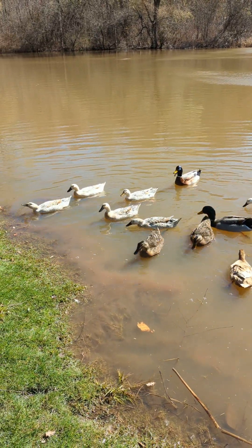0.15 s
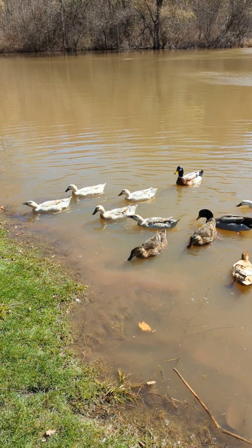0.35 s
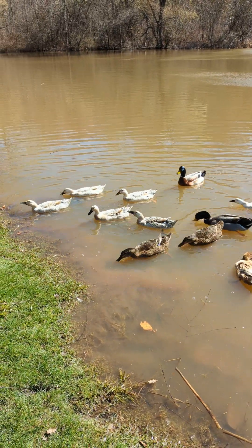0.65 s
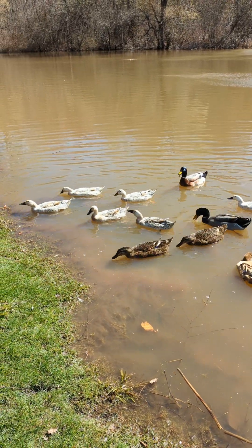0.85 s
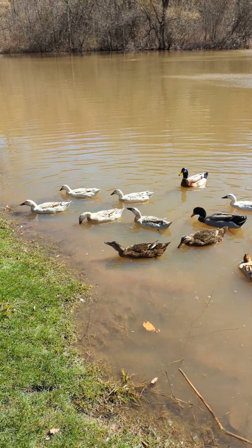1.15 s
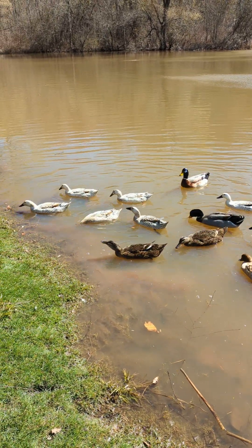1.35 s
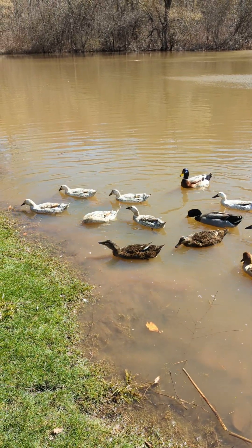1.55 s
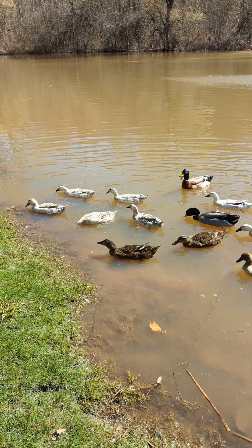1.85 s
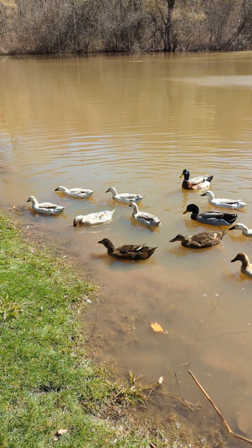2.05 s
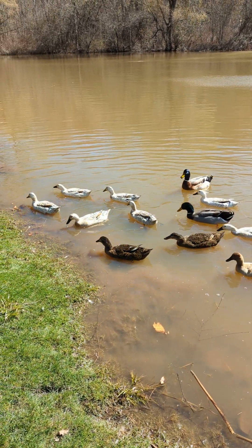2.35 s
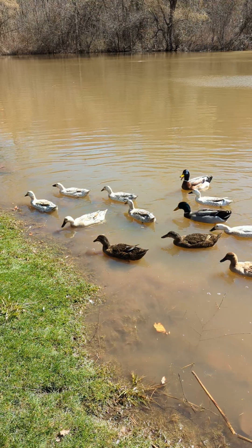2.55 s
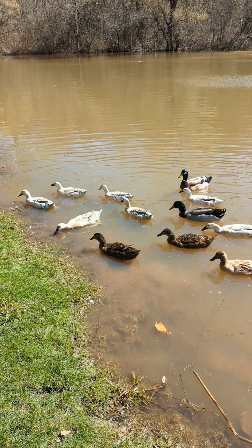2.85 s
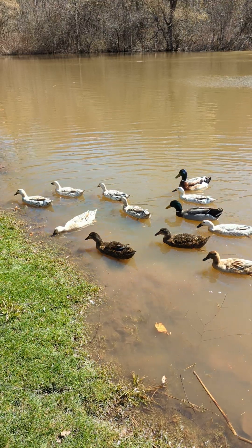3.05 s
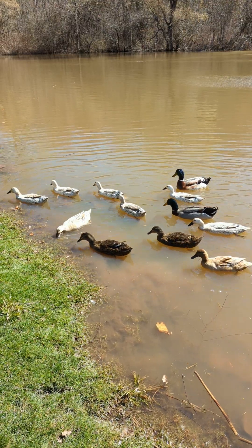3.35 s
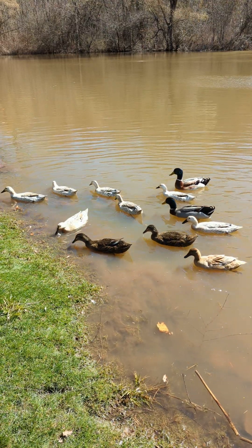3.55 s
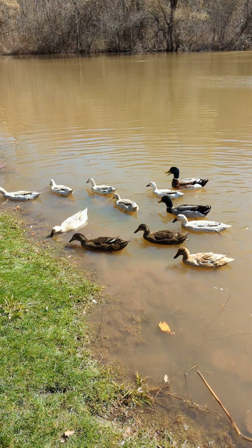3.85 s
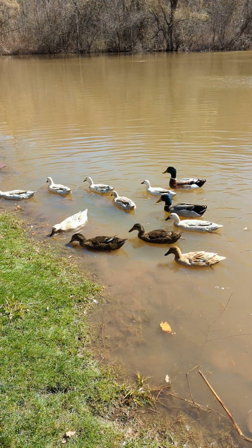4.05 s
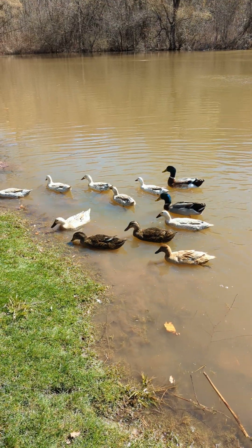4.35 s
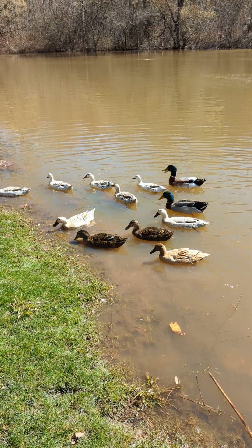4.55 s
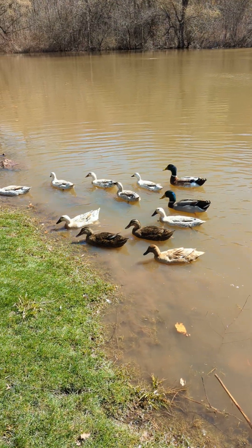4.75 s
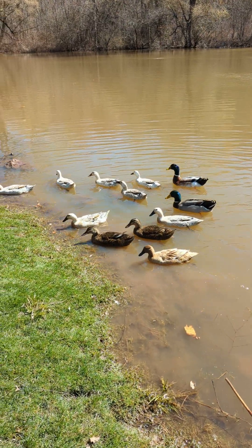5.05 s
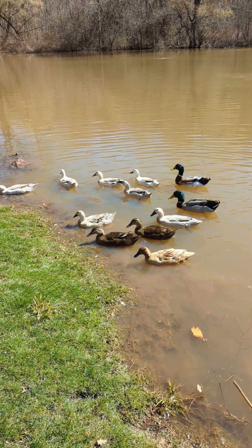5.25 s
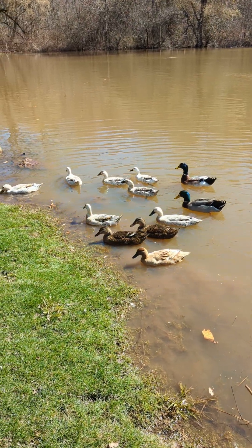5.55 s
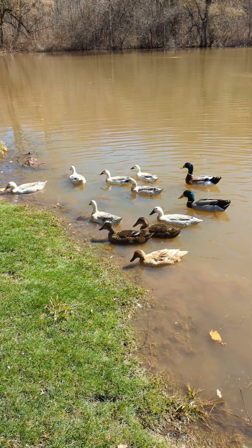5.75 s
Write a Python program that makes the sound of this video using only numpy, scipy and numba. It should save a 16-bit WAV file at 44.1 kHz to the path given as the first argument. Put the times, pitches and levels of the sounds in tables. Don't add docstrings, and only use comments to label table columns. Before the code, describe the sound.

Open pond, handheld stereo microphone: seven short, grating duck calls made of fast air puffs, dry and fairly close, with only weak echoes from water and banks. Wind thumps softly in the first second, bubbles plop and grass crackles mostly between one and three seconds, then it thins to tiny ticks. A low traffic roar, faint hiss and barely audible cricket continue throughout.

```python
import sys
import numpy as np
from scipy import signal
from scipy.io import wavfile
from scipy.ndimage import uniform_filter1d
from numba import njit

SR = 44100
rng = np.random.default_rng(int(sys.argv[2]) if len(sys.argv) > 2 else 0)


def unload_wav(signal):
    wavfile.write(
        sys.argv[1],
        SR,
        np.round(np.clip(np.atleast_2d(signal).T, -1, 1) * 32767).astype(np.int16),
    )


def amplitude_ratio(level_db):
    exponent = np.asarray(level_db, float) / 20
    return 10 ** exponent


N = 260190


def rms_one(x):
    return x / np.sqrt(np.mean(x ** 2) + 1e-20)


def in_time(rows, t=np.arange(N) / SR):
    s, *columns = np.transpose(rows)
    return [np.interp(t, s, c) for c in columns]


def at_hz(points, hz):
    table_hz, values = np.array(points).T[:2]
    return np.interp(np.log(hz), np.log(table_hz), values)


def drift(rate):
    r = np.exp(-80 * np.pi * rate / SR)
    white = rng.standard_normal(N // 40 + 2002)
    slow = signal.lfilter([1], [1, -2 * r, r * r], white)[2000:]
    return np.interp(np.arange(N) / 40, np.arange(len(slow)), rms_one(slow))


def bump(s, width):
    return np.exp(-((np.arange(N) / SR - s) / width) ** 2)


def resonate(x, hz, width):
    r = np.exp(-np.pi * width / SR)
    feedback = [1, -2 * r * np.cos(2 * np.pi * hz / SR), r * r]
    return signal.lfilter([(1 - r * r) / 2, 0, (r * r - 1) / 2], feedback, x)


@njit
def gliding(x, hz, r, turn):
    y = np.zeros(len(x))
    for i in range(2, len(x)):
        y[i] = x[i] - x[i - 2] + 2 * r * np.cos(turn * hz[i]) * y[i - 1] - r * r * y[i - 2]
    return y


def pan(x, db):
    return x * amplitude_ratio(np.array([db / 2, -db / 2]).reshape(2, -1))


# f/Hz, likeness/0-1
LIKENESS = [(60, 1), (180, 0.97), (550, 0.88), (1650, 0.14), (4970, 0.06), (15000, 0.08)]


def banded_noise(spectrum, low_hz, count, patchy_db, flicker, alike_share):
    out, together = 0, drift(flicker / 3)
    edges = np.minimum(low_hz * 2 ** (np.arange(count + 1) / 3), .45 * SR)
    white = rng.standard_normal((2, 2, N))
    for k, (low, high) in enumerate(zip(edges, edges[1:])):
        band = signal.butter(2, [low, high], "band", fs=SR, output="sos")
        mid, side = signal.sosfilt(band, white[k % 2])
        hz = np.sqrt(low * high)
        alike = np.clip(alike_share * at_hz(LIKENESS, hz), 0, 1)
        gain = amplitude_ratio(at_hz(spectrum, hz) + patchy_db * (.6 * together + drift(flicker)))
        out = out + gain * (np.sqrt(1 + alike) * mid + np.sqrt(1 - alike) * side * [[1], [-1]])
    return rms_one(out)


def wavering(hz, width):
    moving_hz = hz + 0.292 * width * drift(7.0)
    return amplitude_ratio(2.43 * drift(5.8)) * np.sin(2 * np.pi * np.cumsum(moving_hz) / SR)


# t/s, level/dB
TRAFFIC_SWELLS = [(0.0, -64.5), (0.36, -63.5), (0.85, -68), (1.13, -61), (1.53, -63.5), (1.94, -58.5),
                  (2.27, -64.5), (2.63, -59.5), (2.99, -63), (3.16, -60.5), (3.71, -65.5), (4.01, -59),
                  (4.29, -61.5), (5.01, -60), (5.9, -59)]
# f/Hz, level/dB per Hz
TRAFFIC_COLOUR = [(24, -55), (40, -10), (119, -2.5), (139, -14), (173, -7.5), (206, -4.5), (319, -15.5),
                  (473, -9.5), (1400, -11), (1610, -15.5), (1920, -18), (2210, -16.5), (4500, -42),
                  (5850, -65), (9900, -120)]
# f/Hz, level/dB per Hz
HISS_COLOUR = [(1470, -29), (2500, 13.5), (5350, -3), (5920, 21), (8600, -46), (11600, -78), (13200, -14),
               (14500, 4), (16000, -4)]
# f/Hz, width/Hz, level/dB
HUMS = [(146.8, 10.7, -68.5), (205.4, 8.3, -66.5), (239.3, 2.03, -74), (1533, 12.2, -77.5),
        (1750, 20.1, -78.5), (14060, 40, -95)]
HISS_DB, HISS_FOLLOWS = -71.5, 0.2
CRICKET_HZ, CRICKET_WIDTH_HZ, CRICKET_DB, CHIRPS_PER_S = 12000, 170, -90.5, 29
PORT_HZ, PORT_WIDTH_HZ, PORT_DB = 5980, 900, -77


def distance():
    traffic_db, = in_time(TRAFFIC_SWELLS)
    hiss_db = HISS_DB + HISS_FOLLOWS * (traffic_db - traffic_db.mean())
    roar = banded_noise(TRAFFIC_COLOUR, 45, count=20, patchy_db=.5, flicker=9, alike_share=.99)
    hiss = banded_noise(HISS_COLOUR, 2970, count=8, patchy_db=3.5, flicker=26, alike_share=.37)
    tones = sum(amplitude_ratio(db) * wavering(hz, width) for hz, width, db in HUMS)
    chirps = np.maximum(0, np.sin(2 * np.pi * CHIRPS_PER_S * np.arange(N) / SR + drift(2.5)))
    cricket = chirps * resonate(rng.standard_normal(N), CRICKET_HZ, CRICKET_WIDTH_HZ)
    port = rng.standard_normal((2, N))
    for _ in range(2):
        port = resonate(port, PORT_HZ, PORT_WIDTH_HZ)
    out = amplitude_ratio(traffic_db + 3) * roar + amplitude_ratio(hiss_db) * hiss
    out = out + amplitude_ratio(traffic_db + 63) * tones
    return out + amplitude_ratio(CRICKET_DB) * rms_one(cricket) + amplitude_ratio(hiss_db - HISS_DB + PORT_DB) * rms_one(port)


# t/s, level/dB
BREEZE = [(0, -61), (.4, -53), (.68, -51), (.82, -64.5), (2.0, -60.5), (3.5, -62), (4.2, -72), (5.9, -72.5)]
# t/s, peak level/dB, left-right/dB
GUSTS = [(.43, -56, -14), (.61, -58.5, -15), (1.0, -51, 0), (1.12, -59, -10), (1.28, -57, -1),
         (1.39, -58, -6), (1.6, -62.5, -18), (1.77, -62, 11), (1.89, -60.5, 13), (2.19, -53, -4),
         (2.63, -69, 6), (2.89, -58, -16), (3.02, -69, -12), (3.37, -57.5, -10), (3.48, -62, -11),
         (3.68, -69, 12), (4.34, -58.5, 16), (4.49, -66, 4), (5.65, -68, 10)]
# f/Hz, level/dB per Hz
BUFFET_COLOUR = [(15, -46), (25, -55), (41, 2), (108, 0), (227, -12.5), (375, -19), (409, -69), (500, -39),
                 (650, -69), (1100, -120)]
GUST_S, BREEZE_SIDE_DB = 0.031, -3.5


def wind():
    breeze_db, = in_time(BREEZE)
    level = pan(amplitude_ratio(breeze_db), BREEZE_SIDE_DB)
    for s, db, side_db in GUSTS:
        level = level + pan(amplitude_ratio(db) * bump(s, GUST_S), side_db)
    lumps = amplitude_ratio(3.3 * np.array([drift(16), drift(24)]))
    rumble = banded_noise(BUFFET_COLOUR, 27.24, count=12, patchy_db=3, flicker=7.8, alike_share=0)
    return level * rms_one(lumps * rumble)


# t/s, peak level/dB, f/Hz, left-right/dB
THUMPS = [
    (0.439, -43.5, 108, -18),
    (.538, -46.5, 113, 7),
    (.695, -50.5, 130, 11),
    (2.233, -46, 72, -20),
]


def thumps():
    out = np.zeros((2, N))
    for s, peak_db, hz, side_db in THUMPS:
        cycles = np.arange(round(2 * SR / hz)) * hz / SR
        push = np.sin(np.pi * cycles / 2) ** 2 * np.cos(2 * np.pi * cycles + np.pi)
        at = round(s * SR)
        out[:, at:at + len(cycles)] += pan(amplitude_ratio(peak_db) * push, side_db)
    return out


# t/s, level/dB
RUSTLE = [(0.0, -68.5), (0.7, -74), (1.4, -71), (2.2, -67), (2.6, -80), (3.0, -64.5), (3.6, -74.5),
          (4.3, -73.5), (5.9, -78.5)]
# f/Hz, level/dB per Hz
GRASS_COLOUR = [(1470, -37), (2500, -7), (3080, -4), (3230, -15), (4020, -10.5), (8940, -12),
                (15200, -16.5), (16000, -11)]
# t/s, peak level/dB, length/s
BRUSHES = [(0.669, -53, 0.02), (1.24, -44, 0.029), (1.31, -38, 0.025), (1.37, -42.5, 0.018),
           (1.477, -35, 0.0068), (1.636, -37.5, 0.019), (1.83, -44, 0.019), (2.187, -53, 0.025),
           (2.2862, -42, 0.011), (2.338, -39, 0.013), (2.629, -48, 0.024), (2.789, -42, 0.016),
           (2.893, -41.5, 0.021), (2.922, -42.5, 0.031), (3.018, -56, 0.0097), (3.364, -50, 0.0089),
           (5.66, -60, 0.011)]
CALL_SWELL_DB, CALL_SWELL_S = -25, 0.14


def grass():
    t, (level_db,) = np.arange(N) / SR, in_time(RUSTLE)
    level = amplitude_ratio(level_db - 2.5)
    for (first, full, _), (call_db, *_) in zip(CALL_TIMES, CALL_DB):
        level = level + amplitude_ratio(call_db + CALL_SWELL_DB) * bump(first + full - .06, CALL_SWELL_S)
    for s, peak_db, length in BRUSHES:
        age = np.clip((t - s) / length, 0, 9)
        level = level + amplitude_ratio(peak_db - 18) * np.sqrt(age) * np.exp(-age ** 2)
    grains = amplitude_ratio(2.5 * drift(170))
    rub = banded_noise(GRASS_COLOUR, 3000, count=8, patchy_db=1.3, flicker=30, alike_share=.9)
    return level * rms_one(grains * rub)


# t/s, peak level/dB, f/Hz, top crack level/dB, left-
# right/dB
TICKS = [(0.4455, -53, 4420, -75, -1.5), (0.5185, -58, 5840, -54, -3), (0.628, -55, 4300, -77, 0.0),
         (0.6659, -51, 6000, -74, -1.5), (1.242, -39, 5330, -65, -8), (1.25, -38.5, 6100, -43, -5),
         (1.9549, -66, 4250, -71, 0.0), (2.1996, -57, 5030, -68, 3), (2.2172, -49, 8050, -46, -1.5),
         (2.2862, -57, 6660, -63, -0.5), (2.799, -52, 7200, -47, 3), (2.984, -38.5, 5760, -50, -9),
         (3.022, -50, 5470, -69, -8), (3.0383, -58, 5900, -51, -0.5), (3.372, -52, 4800, -48, -1.0),
         (4.1006, -50.5, 6140, -72, -25), (4.2237, -53, 5970, -78, -3), (4.4757, -59, 6300, -77, 10),
         (4.804, -55, 6220, -75, -8), (4.8688, -53, 6240, -67, -0.5), (4.923, -57, 6000, -53, -4),
         (5.661, -53, 4400, -56, -1),
         (0.0608, -74, 12100, -69, 0.1),
    (1.8284, -42, 11100, -49, 0.1),
    (2.632, -48, 9000, -54, 0.1),
    (3.813, -61, 8980, -72, 0.1),
    (3.9265, -61, 12000, -69, 0.1),
    (3.974, -65, 8360, -52, 0.1),
    (4.0127, -51, 12600, -63, 0.1),
    (4.0744, -60, 13500, -50, 0.1),
    (5.3792, -71, 14000, -70, 0.1),
]
# t/s, peak level/dB, f/Hz, time to fall 60 dB/s
PLOPS = [
    (1.2388, -36, 1430, 0.006),
    (1.3027, -29.5, 1740, 0.0089),
    (1.5384, -55, 1510, 0.011),
]


def droplets():
    out, t = np.zeros((2, N)), np.arange(900) / SR
    top = signal.butter(1, 5000, "high", fs=SR, output="sos")
    for s, peak_db, hz, top_db, side_db in TICKS:
        burst = rng.standard_normal((2, len(t))) * t / 0.00082 * np.exp(1 - t / 0.00039)
        ring = resonate(resonate(burst[0], hz, .3 * hz), hz, .6 * hz)
        crack = amplitude_ratio(top_db + 5) * signal.sosfilt(top, burst)
        at = round((s + 0.0014) * SR)
        out[:, at:at + len(t)] += pan(amplitude_ratio(peak_db) * ring / abs(ring).max() + crack, side_db)
    for s, peak_db, hz, t60 in PLOPS:
        at = round((s + 0.0025) * SR)
        splash = amplitude_ratio(peak_db - 11) * rng.standard_normal(len(t)) * np.exp(-t / .0004)
        swell = 1 - np.exp(-t / 0.0001)
        tone = np.sin(2 * np.pi * hz * (t + 3.7 * t ** 2))
        out[:, at:at + len(t)] += splash + swell * amplitude_ratio(peak_db - 60 * t / t60) * tone
    return out


FIRST_PUFFS_PER_S, QUICKEN_PER_S2 = 67, 120
STALL_PER_S3, STALL_EARLY_S, SLOWEST_PER_S = 12000, .012, 55


def puff_pace(t, first, full, pace):
    stall = STALL_PER_S3 * np.maximum(t - first - full + STALL_EARLY_S, 0) ** 2
    steady = pace * (FIRST_PUFFS_PER_S + QUICKEN_PER_S2 * (t - first))
    rate = np.maximum(steady - stall, SLOWEST_PER_S)
    cycles = np.cumsum(rate) / SR
    return rate, cycles - np.interp(first, t, cycles)


# share at start/0-1, opening/s, share at end/0-1, closing/s, wobble share/0-1
BILL_DROOP = (0.31, 0.025, 0.45, 0.031, 0.016)


def bill_scale(t, wobble):
    shut, opening, shut_again, closing, wobble_share = BILL_DROOP
    droop = shut * np.exp((t[0] - t) / opening) + shut_again * np.exp((t - t[-1]) / closing)
    return 1 - droop + wobble_share * wobble


def envelope(age, full, phrasing, attack_db, attack, swell, hold, release):
    swell_share, extra_hold = phrasing
    rise = attack_db * np.exp(-age / attack) + swell_share * swell * np.maximum(full - age, 0)
    return -rise - release * np.maximum(age - full - hold - extra_hold, 0)


SWEEP_MS_PER_KHZ = .8
PUFF_DETUNE = .018
SNAP = 9


def ring_pipe(hz, width, air, puff_db, rate, cycles, scale, rise_ms, leak):
    late = cycles + rate * (.0058 - SWEEP_MS_PER_KHZ * min(hz, 7500) * 1e-6)
    count = np.floor(late).astype(int) % 64
    age = late % 1 / rate / (rise_ms * 0.0015)
    size = amplitude_ratio(puff_db)[count]
    snap = np.diff(age > rng.uniform(.5, 1.5, 64)[count], prepend=True) & (age > .4)
    rung = air * (size * age * np.exp(1 - age) + leak) + SNAP * size * snap
    bend = scale if hz < 3000 else scale ** 0.3
    moving_hz = hz * bend * (1 + PUFF_DETUNE * rng.standard_normal(64)[count])
    for spread in (1.6, 2.2):
        rung = gliding(rung, moving_hz, np.exp(-np.pi * width * spread / SR), 2 * np.pi / SR)
    return rung / np.sqrt(uniform_filter1d(rung ** 2, size=1800) + 1e-12)


# f/Hz, width/Hz, level/dB, left-right/dB
PIPE = [
    [(794, 1050, -10.5, 1.5), (1406, 56, -13, -6.5), (2642, 129, 4, -3.5), (2800, 100, -3, 0)],
    [(1510, 210, -19, 8), (1740, 120, 2.5, 1.5), (1985, 118, 4, -6), (2150, 73, 9.5, 2.5)],
    [(3263, 163, 5.5, -1.5), (3947, 114, 2, -10.5), (4736, 180, -4, -8)],
    [(5300, 270, -31, -27), (5424, 370, 10.5, -5), (6100, 204, 11, -7.5), (6620, 280, -11, -33.5),
     (7300, 230, -28, -3), (12500, 6500, -16.5, 13)],
]
# rise/ms, steady leak/0-1
PUFF_SHAPE = [
    (.7, .11),
    (.65, .10),
    (.6, .13),
    (1.1, .45),
]
# attack depth/dB, attack/s, swell/dB per s, hold/s, release/dB per s
EFFORT = [
    (24, 0.031, 34.5, 0.011, 596),
    (10, 0.018, 35.5, 0.0079, 311),
    (7.9, 0.027, 103, 0.0095, 704),
    (7.8, 0.021, 64, 0.0029, 553),
]
LEAD_IN_S, TAIL_S = .015, .085
PUFF_SPREAD_DB, BILL_WIDTH_OCTAVES = 1, 0.37


def call(timing, levels, cavity, turn, phrasing, wobble, waver):
    first, full, pace = timing
    at, end = round((first - LEAD_IN_S) * SR), round((first + full + TAIL_S) * SR)
    t = np.arange(at, end) / SR
    rate, cycles = puff_pace(t, first, full, pace)
    scale = bill_scale(t, wobble[at:end])
    bill_hz = scale * np.interp(t, [first, first + full], cavity)
    air = rng.standard_normal(len(t))
    puff_db = PUFF_SPREAD_DB * rng.standard_normal(64)
    main_db, *others_db = levels
    out = np.zeros((2, len(t)))
    groups = zip(["main", "throat", "bill", "rasp"], PIPE, PUFF_SHAPE, EFFORT, [0, *others_db], [0, 0, *turn])
    for name, modes, (rise_ms, leak), effort, rel_db, tilt in groups:
        group, power = 0, 0
        middle_hz = modes[len(modes) // 2][0]
        for hz, width, level_db, side_db in modes:
            rung = ring_pipe(hz, width, air, puff_db, rate, cycles, scale, rise_ms, leak)
            gain = amplitude_ratio(level_db + tilt * np.log2(min(hz, 7500) / middle_hz))
            if name == "throat":
                gain = gain * (0.081 + np.exp(-(np.log2(hz / bill_hz) / BILL_WIDTH_OCTAVES) ** 2))
            group = group + pan(rung, side_db) * gain
            power = power + gain ** 2
        breath_db = envelope(t - first, full, phrasing, *effort) + waver[at:end]
        out += group / np.sqrt(power) * amplitude_ratio(main_db + rel_db + breath_db)
    return at, out


# first puff t/s, time to full effort/s, pace of the puffs re usual
CALL_TIMES = [
    (.0625, .25, 1.004),
    (.8751, .232, .991),
    (1.6924, .225, .991),
    (2.3998, .232, 1.004),
    (3.1037, .215, 1.018),
    (3.7759, .232, .996),
    (4.5103, .215, .974),
]
# throat/dB, open bill/dB, rasp/dB
CALL_DB = [(-41, -6.5, 0.5, -6.5), (-43.5, -5, 1, -7), (-42, -2, -2, -8.5), (-40.5, -3.5, -5, -7.5),
           (-43.5, 1, -5.5, -7), (-49.5, 5, -6.5, -8.5), (-46.5, 0, -9, -13.5)]
# first puff f/Hz, full effort f/Hz
CAVITY = [(1980, 2140), (1970, 2300), (2050, 2070), (2220, 1950), (2160, 1770), (1950, 1800), (1900, 2000)]
# bill tilt/dB per octave, rasp tilt/dB per octave
TURN = [(0, 7), (-2, 18), (0, 13), (-9, -10), (-1, -63), (4, -36), (2, -37)]
# swell re usual, extra hold/s
PHRASING = [(1.07, 0.0019), (0.87, 0.0016), (1.17, 0.0044), (0.91, 0.0074), (1.13, .004), (1.17, 0.013),
            (1.18, 0.0038)]
# delay t/s, level/dB
WATER_ECHO = [
    (.0035, -14),
    (.021, -26),
    (.047, -29),
]
LEFT_LEAD_S, BREATH_WAVER_DB = 4.5e-5, .5


def drake():
    out, wobble, waver = np.zeros((2, N)), drift(6), BREATH_WAVER_DB * drift(9.2)
    for row in zip(CALL_TIMES, CALL_DB, CAVITY, TURN, PHRASING):
        at, sound = call(*row, wobble, waver)
        out[:, at:at + sound.shape[1]] += sound
    out[1] = np.interp(np.arange(N) - LEFT_LEAD_S * SR, np.arange(N), out[1])
    echoes = 0
    for k, (s, db) in enumerate(WATER_ECHO):
        sides = out[::(-1) ** k]
        echoes = echoes + amplitude_ratio(db) * np.roll(sides, round(s * SR), axis=1)
    return out + echoes


def scene():
    return distance() + wind() + thumps() + grass() + droplets() + drake()


def top_cut(x):
    return signal.sosfilt(signal.butter(12, 16330, fs=SR, output="sos"), x)


def record(dry):
    x = signal.sosfilt(signal.butter(3, 48, "high", fs=SR, output="sos"), dry)
    x = signal.sosfilt(signal.cheby2(14, 60, 16250, fs=SR, output="sos"), x)
    return top_cut(x)


dry = scene()
out = record(dry)
unload_wav(out)
```